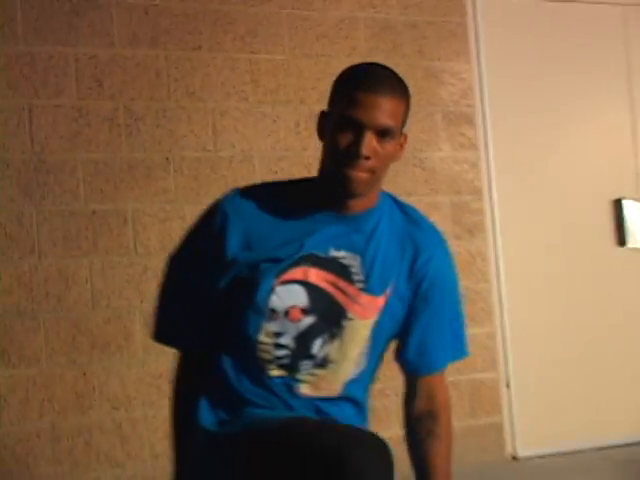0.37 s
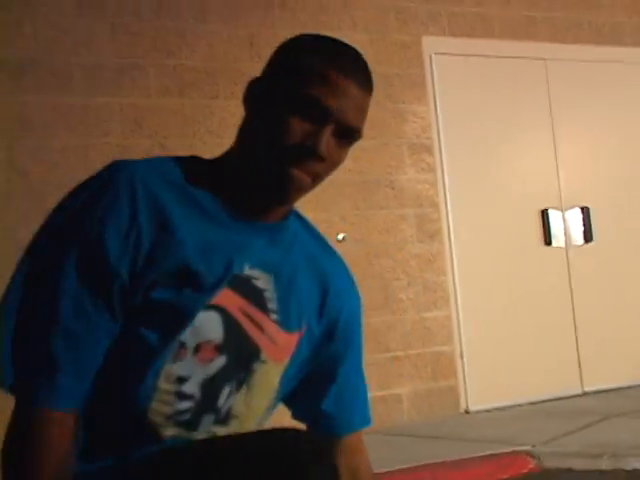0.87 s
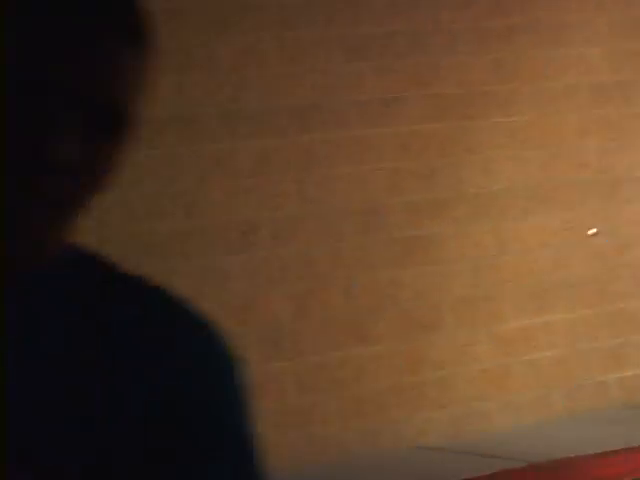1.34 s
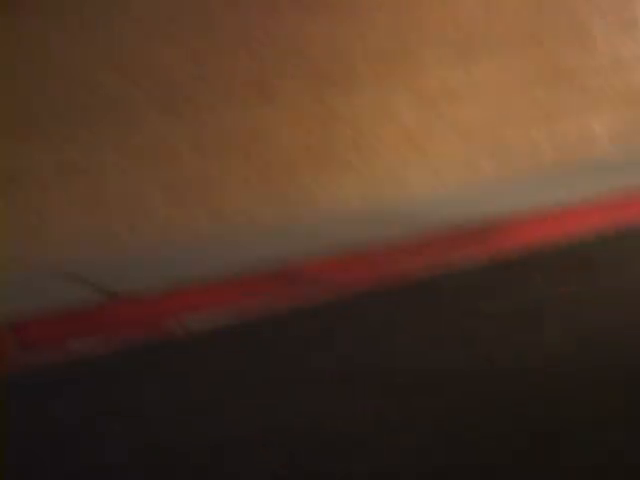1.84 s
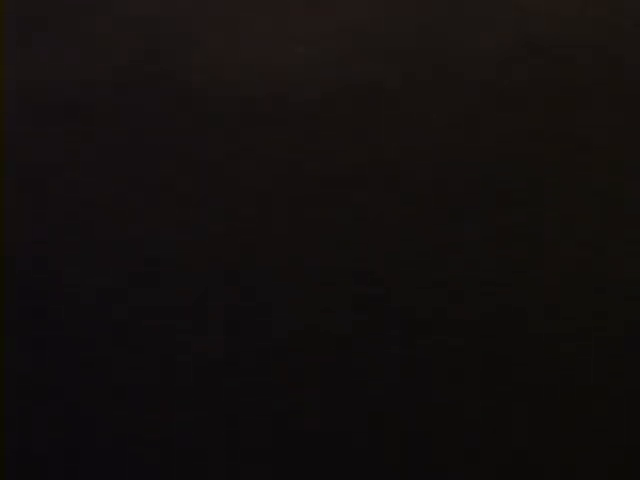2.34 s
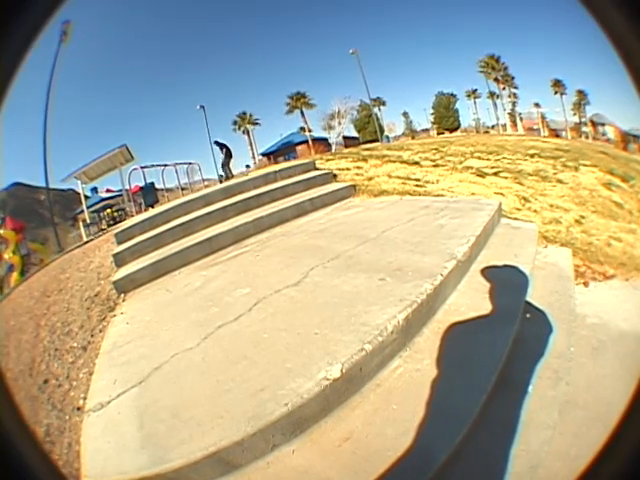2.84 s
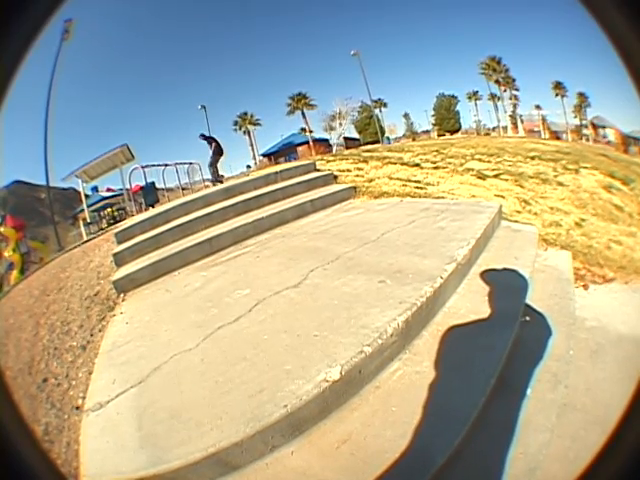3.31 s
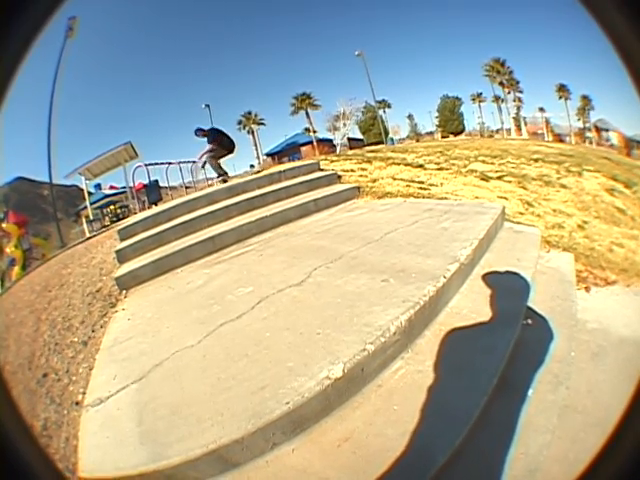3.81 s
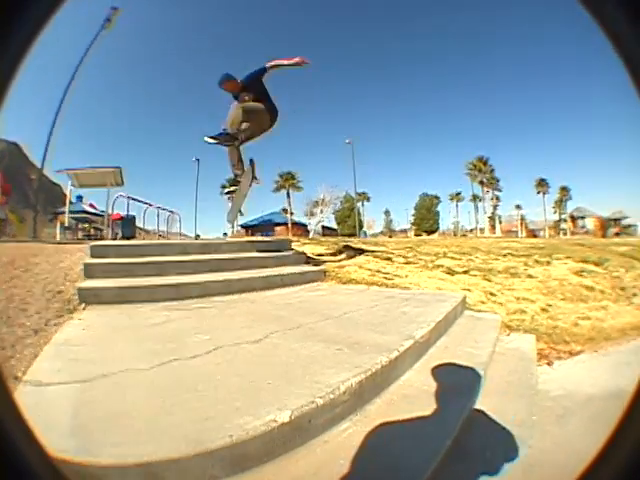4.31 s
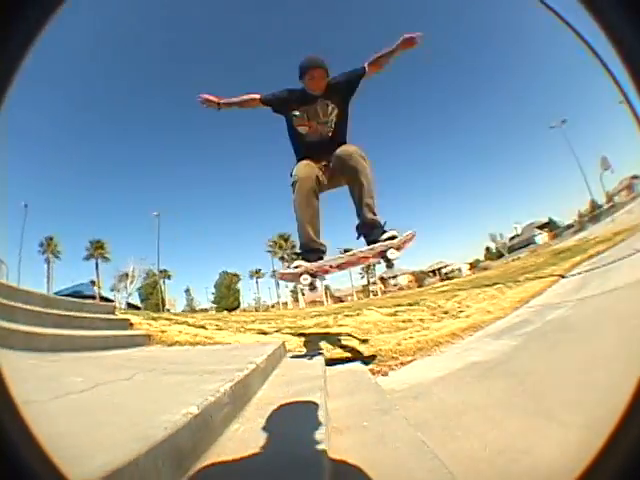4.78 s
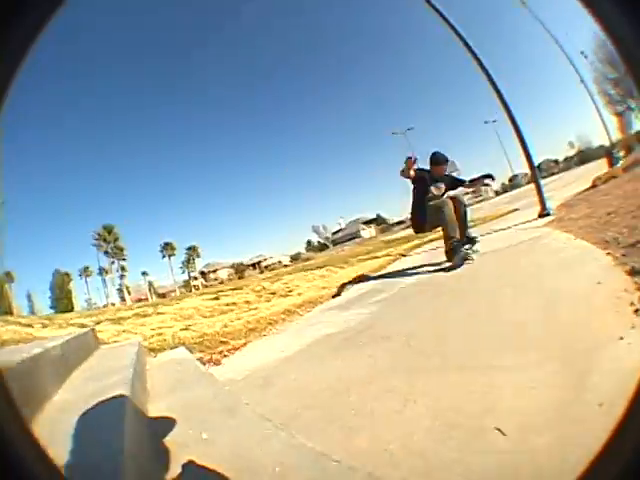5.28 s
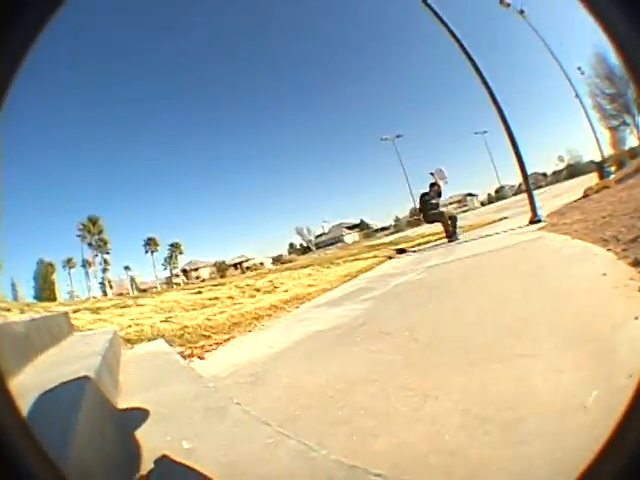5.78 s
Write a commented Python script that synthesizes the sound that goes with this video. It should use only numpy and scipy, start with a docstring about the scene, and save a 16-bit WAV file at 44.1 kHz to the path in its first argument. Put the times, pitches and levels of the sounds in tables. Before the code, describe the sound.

From 0 to about 2.5 s a small generator holds a low, buzzing hum near 70 Hz with throbbing clatter, rising very slightly at the end. A skateboard on coarse asphalt gets loud from 0.8 s, with hard wooden knocks between 0.9 and 1.4 s, a short skid near 1.0 s and another knock at 1.75 s, then fades. At 2.55 s everything cuts instantly to a quiet open park with faint low town noise. A board nears on smooth concrete: a soft double clack at 2.75 and 2.84 s, a much sharper pair at 3.45 and 3.53 s, growing grit, scuffs, then a crisp pop at 4.25 s. In the air, thin bearing whirr and fluttering hiss. At 4.95 s a massive clustered slam distorts the microphone, followed by gritty rolling, a loud slap at 5.3 s, smaller knocks until 5.85 s, and deep wind buffets.

```python
"""A car park at night, then a park by day, with an abrupt cut between them.
Night: a small generator drones (tones over throbbing noise) while a skateboard rolls off over rough asphalt.
Day: a board nears over smooth slabs, clacks across two joints, pops, spins in the air, slams down hard enough
to overload the input and rolls away. Rolling is gritty noise through resonances; blows are short chatter
ringing the board; wind on the single microphone is deep, lumpy noise."""
import sys
import numpy as np
from scipy import signal
from scipy.fft import rfft, irfft, next_fast_len
from scipy.io import wavfile
from scipy.ndimage import uniform_filter1d

SR = 44100
rng = np.random.default_rng(int(sys.argv[2]) if len(sys.argv) > 2 else 0)


def volts_from_decibels(level):
    """Turn decibel levels (scalar or array-like) into linear amplitude factors."""
    exponent = np.asarray(level, float) / 20
    return 10 ** exponent


def digitize_waveform(pressure):
    """Quantize a signal to 16-bit integers and store it at the path in sys.argv[1].

    Rows of a 2-D input are taken as channels; values are limited to [-1, 1].
    """
    field = np.atleast_2d(pressure).T
    bounded = np.clip(field, -1, 1)
    quanta = np.round(bounded * 32767).astype(np.int16)
    wavfile.write(sys.argv[1], SR, quanta)


N = 260173
CUT_S = 2.545      # night becomes day
TAKE_OFF_S, LANDING_S = 4.26, 4.955

# generator speed: t/s, firing f/Hz
FIRING_RATE = [(0.15, 71.35), (1.62, 71.6), (2.45, 73.04)]
# exhaust tones: multiple of the firing rate, relative level/dB
EXHAUST_TONES = [(0.5, -22), (1, 0), (1.5, -6.5), (2, -12.5), (2.5, -5), (3, -11), (3.5, -8), (4, -16),
                 (4.5, -23.5), (5, -14.5), (5.5, -27), (6, -26), (6.5, -16.5), (7, -33)]
# colour of the engine clatter: f/Hz, relative level per Hz/dB
CLATTER_COLOUR = [(65, -21), (110, -3.5), (188, 0.5), (386, -9), (455, -47), (700, -23), (896, -8),
                  (1380, -26), (2890, -27), (5250, -26.5), (7770, -48), (15000, -55)]
# rolling past on asphalt: t/s, deck level/dB, wheel level/dB, bearing level/dB
ASPHALT_LEVELS = [(0.0, -29, -37.5, -42.5), (0.7, -27.5, -37.5, -41), (0.78, -21.5, -31.5, -38),
                  (0.863, -25, -27, -33), (0.945, -23, -26, -33), (0.96, -20, -21.5, -29),
                  (1.05, -21.5, -18, -30.5), (1.11, -21, -20, -29.5), (1.29, -19, -22.5, -27.5),
                  (1.42, -18.5, -21, -23.5), (1.5, -20.5, -21.5, -27.5), (1.6, -19, -22, -26),
                  (1.75, -25, -24.5, -30.5), (1.9, -27, -23, -32), (2.1, -29.5, -29, -34),
                  (2.22, -30.5, -28, -35.5), (2.32, -31, -38.5, -40.5), (2.54, -33.5, -41.5, -46.5)]
# nearing, flying past and rolling away over slabs: t/s, deck level/dB, wheel level/dB, bearing level/dB
SLAB_LEVELS = [(2.55, -43, -46, -65.5), (2.8, -45.5, -45, -57), (3.05, -39.5, -39.5, -52.5),
               (3.3, -43, -39.5, -50), (3.45, -40, -38.5, -45.5), (3.73, -38.5, -36.5, -45),
               (3.9, -35, -34, -43.5), (4.085, -31.5, -29.5, -40), (4.2, -38, -34, -34.5),
               (4.3, -43, -32, -33.5), (4.45, -49.5, -31, -39), (4.66, -38, -30, -30.5),
               (4.94, -34, -31.5, -33), (5.0, -21.5, -22.5, -29.5), (5.114, -29.5, -30.5, -40),
               (5.18, -25, -27.5, -33.5), (5.285, -25.5, -21.5, -28.5), (5.38, -28.5, -22, -28.5),
               (5.43, -28.5, -24, -33.5), (5.445, -24, -22, -32), (5.5, -25.5, -22, -31.5),
               (5.54, -23.5, -19, -29.5), (5.66, -21, -23.5, -32), (5.78, -27.5, -34, -40.5),
               (5.85, -25, -27.5, -36), (5.9, -35, -33.5, -42.5)]
# resonances that the rolling drives, all with columns f/Hz, width/Hz, relative level/dB
DECK_ON_ASPHALT_PEAKS = [(262, 78, -5.5), (427.6, 50, -4.5), (502, 47, -2), (586.6, 50, 1.5), (703, 83, -4),
                         (805, 110, -7)]
WHEEL_ON_ASPHALT_PEAKS = [(1007, 180, -4), (1233, 110, -3.5), (1411, 172, -2)]
TRUCK_ON_ASPHALT_PEAKS = [(1575, 146, 8.5), (1868, 280, 7), (2150, 340, 1)]
SLAB_BOOM_PEAKS = [(109, 82, -7), (162.6, 23, 2), (222, 37, -4.5)]
DECK_ON_SLABS_PEAKS = [(364, 73, -0.5), (500, 56, 3.5), (600, 65, 2), (677.6, 45, 5.5), (790, 100, 1.5)]
WHEEL_ON_SLABS_PEAKS = [(900, 130, 1), (1130, 137, 2.5), (1450, 222, 4), (1757, 132, 1), (2023, 244, -1)]
AXLE_PEAKS = [(2350, 840, -6.5), (3240, 420, -5.5), (3530, 190, 1.5), (3945, 200, -0.5)]
# ring of the bearing race: f/Hz, width/Hz, relative level/dB
BEARING_RACE_PEAKS = [(5410, 520, 0)]
# ring of the skidding wheel: f/Hz, width/Hz, relative level/dB
SKID_PEAKS = [(1270, 140, 2), (1420, 170, -1)]
# colour of the bearing hiss by night and by day: f/Hz, relative level per Hz/dB
BEARINGS_NIGHT_COLOUR = [(1350, -41), (2300, -5), (3110, -9), (3480, -11.5), (3770, -11), (4990, -7),
                         (7260, -14.5), (7990, -13.5), (9150, -18.5), (15500, -51.5)]
BEARINGS_DAY_COLOUR = [(3400, -46), (4400, -8), (4900, -5), (5250, -5), (5650, -10.5), (6300, -9),
                       (8500, -12.5), (10400, -20.5), (12800, -36), (15500, -39)]
# colour of the far town noise by day: f/Hz, relative level per Hz/dB
TOWN_COLOUR = [(40, -13), (250, -2.5), (700, -11), (1800, -27), (2600, -26), (15500, -46)]
# what the struck board rings with: f/Hz, relative level/dB, time to fall by 60 dB/s
BOARD_MODES = [(82, -7, 0.054), (190, -7, 0.061), (310, 2, 0.028), (520, -2, 0.033), (699, 0.5, 0.021),
               (920, 2.5, 0.015), (1038, 3.5, 0.016), (1310, -1.5, 0.019), (1520, 3, 0.016),
               (1784, 3, 0.014), (2150, -10, 0.03), (2710, 1.5, 0.0086), (3083, -1, 0.016),
               (3700, 0, 0.018), (4200, -1.5, 0.012), (5200, 6, 0.0049), (6810, 5, 0.0029),
               (8700, 1.5, 0.0036), (13200, -17, 0.0067)]
# nearing, in the air, rolling away: slab boom below deck/dB, axle below bearings/dB (not used in the air)
STAGE_OFFSETS = [(6, 6.5), (10, 0), (12, 7.5)]
# moments when the flipping board shows its edge: t/s
EDGE_ON_TIMES = [4.13, 4.345, 4.564, 4.757, 4.9, 5.04]
# knocks of board, wheels and feet: rough ground, scuffs before the pop, a tick of catching feet in the air:
# t/s, peak level/dB, chatter length/s, favoured f/Hz
BOARD_WHEEL_FOOT_KNOCKS = [(0.286, -26, 0.003, 720), (0.53, -20.5, 0.0035, 1800),
                           (0.89, -12.5, 0.0037, 540), (0.953, -7, 0.0074, 1420),
                           (1.043, -6.5, 0.004, 1280), (1.259, -7, 0.0077, 1460),
                           (1.335, -5.5, 0.0064, 310), (1.405, -3, 0.0024, 590), (1.745, -11, 0.0072, 1230),
                           (3.85, -20, 0.012, 190), (4.187, -23, 0.013, 310), (4.212, -14.5, 0.016, 310),
                           (4.23, -12, 0.0053, 5200), (4.77, -18.5, 0.0028, 5200), (5.031, -9, 0.0081, 520),
                           (5.074, -11, 0.004, 630), (5.185, -12, 0.0091, 500), (5.443, -12, 0.0044, 1410),
                           (5.544, -7.5, 0.0044, 744), (5.823, -9, 0.0074, 520),
                           (5.847, -3.5, 0.0014, 1360)]
# what a knock shakes, one row each for deep, low, middle, high pitch: deck share/dB, truck share/dB
KNOCK_SHARES_BY_PITCH = [(4, -5), (6, -9), (-5, -16), (-4, -2)]
# slab joints: front wheels t/s, peak level/dB, back wheels t/s, peak level/dB, deck share/dB
SLAB_JOINTS = [(2.753, -13, 2.841, -12, 1.5), (3.4471, -4, 3.5334, -1, -4.5)]
# contacts of pop, landing and the slap after it:
# t/s, peak level/dB, truck share/dB, chatter length/s, favoured f/Hz
SLAM_CONTACTS = [(4.245, 4, 2, 0.0014, 3700), (4.248, 3.5, -4, 0.0029, 1520),
                 (4.2549, 3, 4.5, 0.0032, 3700), (4.954, 21, -7, 0.004, 870), (4.96, 10, 2.5, 0.008, 1330),
                 (4.970, 12, 0, 0.0057, 520), (4.976, 14.5, -20, 0.0043, 900),
                 (4.983, 6.5, -8, 0.0058, 520), (5.2964, 11, -10, 0.0058, 1130),
                 (5.303, 0.5, -9, 0.0086, 520)]
# gusts on the microphone: t/s, push level/dB, half length/s, flutter over push/dB
WIND_GUSTS = [(2.2, -28.5, 0.073, -30), (4.613, -46, .06, -15), (4.87, -29.5, .08, -10),
              (4.999, -33, 0.063, 8.5), (5.232, -36, 0.095, 1), (5.562, -47, .06, 14), (5.85, -41, 0.13, 6)]


def rms_one(x):
    """Scale to unit rms."""
    return x / np.sqrt(np.mean(x ** 2) + 1e-20)


def in_time(rows):
    """Draw each column of a table as a curve over every sample."""
    s, *columns = np.transpose(rows)
    return [np.interp(np.arange(N) / SR, s, column) for column in columns]


def drift(rate):
    """Slow random wander of spread 1, changing about rate times a second."""
    r = np.exp(-2 * np.pi * rate / SR)
    noise = rng.standard_normal(N + SR)
    return rms_one(signal.lfilter([1], [1, -2 * r, r * r], noise)[SR:])      # drop the filter's warm-up


def coloured(x, spectrum):
    """Give a broad signal a spectrum; rms 1."""
    size = next_fast_len(N)
    hz, db = np.transpose(spectrum)
    grid = np.maximum(np.arange(size // 2 + 1) * SR / size, 1)
    gain = volts_from_decibels(np.interp(np.log(grid), np.log(hz), db))
    return rms_one(irfft(rfft(x, size) * gain, size)[:N])


def resonant(x, peaks):
    """Parallel resonances, each passed twice so the valleys between them stay dark; rms 1."""
    out = 0
    for k, (hz, width_hz, db) in enumerate(peaks):
        r = np.exp(-np.pi * 1.5 * width_hz / SR)      # each pass is wider; two together give about width_hz
        b = (1 - r * r) / 2 * np.array([1, 0, -1])
        a = [1, -2 * r * np.cos(2 * np.pi * hz / SR), r * r]
        twice = signal.lfilter(b, a, signal.lfilter(b, a, x))
        out = out + (-1) ** k * volts_from_decibels(db) * twice
    return rms_one(out)


def ring(x, hz, t60):
    """A decaying mode: a unit click rings at about height 1 and falls 60 dB in t60 seconds."""
    r, w = volts_from_decibels(-60 / (t60 * SR)), 2 * np.pi * hz / SR
    return signal.lfilter([0, np.sin(w)], [1, -2 * r * np.cos(w), r * r], x + 1e-18)


def grit(per_s, spread_db, smooth, lumps_db):
    """Ground under the wheels: uneven clicks on a smooth rub, with a level that wanders in lumps."""
    sizes = volts_from_decibels(spread_db * np.minimum(rng.exponential(1, N), 5)) * rng.choice([-1, 1], N)
    clicks = rms_one(sizes * (rng.random(N) < per_s / SR))
    rub = smooth * rng.standard_normal(N)
    return (clicks + rub) * volts_from_decibels(lumps_db * drift(30))


def generator():
    """Low orders of one repeating exhaust pulse, wavering a little, over clatter that throbs with the cycle."""
    cycles = np.cumsum(in_time(FIRING_RATE)[0]) / SR
    tones = 0
    for order, db in EXHAUST_TONES:
        phase = order * cycles + 0.1094 * order ** 2      # the pipe smears the pulse
        waver_db = 0.2 * order * drift(2.7)      # high orders waver most
        tones = tones + volts_from_decibels(db + waver_db) * np.cos(2 * np.pi * phase)
    throb = 1 + 0.78 * np.cos(np.pi * cycles)      # once per two firings
    clatter = coloured(rng.standard_normal(N), CLATTER_COLOUR) * throb * volts_from_decibels(.5 * drift(20))
    return volts_from_decibels(-24.5) * rms_one(tones) + volts_from_decibels(-36) * clatter


def asphalt_roll():
    """Coarse stones under front and back wheels shake deck, wheels, trucks and bearings."""
    deck_db, wheel_db, bearing_db = in_time(ASPHALT_LEVELS)
    t = np.arange(N) / SR
    truck_lag_s, truck_under_wheel_db, truck_fades_db_per_s = 0.024, 6, 0.5
    late_wheel_db = np.interp(t - truck_lag_s, t, wheel_db)      # the trucks come into view after the wheels
    truck_db = late_wheel_db - truck_under_wheel_db - truck_fades_db_per_s * (t - 1)
    near = np.clip((wheel_db + 42) / 18, .2, 1)      # distance blurs the lumps
    front = grit(per_s=3000., spread_db=4.5, smooth=0.65, lumps_db=2.66 * near)
    back = grit(per_s=3500., spread_db=4.5, smooth=0.94, lumps_db=0.79 * near)
    chips = grit(per_s=150., spread_db=4.5, smooth=0.1, lumps_db=2.0)      # loose chips crackle
    hiss = coloured(front + back + 0.67 * chips, BEARINGS_NIGHT_COLOUR) * volts_from_decibels(1.54 * drift(13.4))
    return (volts_from_decibels(deck_db) * resonant(back, DECK_ON_ASPHALT_PEAKS)
            + volts_from_decibels(wheel_db) * resonant(front + 0.5 * back, WHEEL_ON_ASPHALT_PEAKS)
            + volts_from_decibels(truck_db) * resonant(front + 0.6 * back, TRUCK_ON_ASPHALT_PEAKS)
            + volts_from_decibels(bearing_db) * hiss
            + skid(back))


def skid(stones):
    """A wheel skids briefly: the stones drive its ring, which rises fast, holds and stops."""
    start_s, rise_s, length_s, level_db = 0.96, 0.0018, .1, -17
    since = np.maximum(np.arange(N) / SR - start_s, 0)
    envelope = (1 - np.exp(-since / rise_s)) * np.exp(-(since / length_s) ** 6)
    return volts_from_decibels(level_db) * envelope * resonant(stones, SKID_PEAKS)


def wind():
    """Lumpy pressure on the microphone: a deep push with a quicker flutter in gusts, and in the day's calm."""
    calm_night_db, calm_day_db, flutter_over_calm_db = -38.5, -52, -1.5
    t = np.arange(N) / SR
    calm = volts_from_decibels(np.where(t < CUT_S, calm_night_db, calm_day_db))
    push_level = calm
    flutter_level = volts_from_decibels(flutter_over_calm_db) * calm * (t >= CUT_S)
    for s, db, half_s, flutter_db in WIND_GUSTS:
        gust = volts_from_decibels(db) * np.exp(-((t - s) / half_s) ** 2)
        push_level = push_level + gust
        flutter_level = flutter_level + volts_from_decibels(flutter_db) * gust
    lumps = rng.standard_normal(N) * volts_from_decibels(1.0 * drift(6.8))

    def band(low_hz, high_hz):
        """One band of the lumps, its level swings halved; rms 1."""
        x = signal.sosfilt(signal.butter(2, [low_hz, high_hz], "band", fs=SR, output="sos"), lumps)
        return rms_one(x / uniform_filter1d(x ** 2, size=SR // 16) ** .25)

    return push_level * band(24, 51) + flutter_level * band(55, 99)


def contacts():
    """Every blow as (t/s, peak/dB, deck share/dB, truck share/dB, chatter length/s, favoured f/Hz)."""
    rows = []
    for s, db, length_s, hz in BOARD_WHEEL_FOOT_KNOCKS:
        deck_db, truck_db = KNOCK_SHARES_BY_PITCH[np.digitize(hz, [400, 850, 2500])]
        rows.append((s, db, deck_db, truck_db, length_s, hz))
    for s, db, truck_db, length_s, hz in SLAM_CONTACTS:
        deck_db = -1 - 6 * np.log2(hz / 1000)      # low contacts flex the deck more
        rows.append((s, db, deck_db, truck_db, length_s, hz))
    front_hz, back_hz, snap_hz = 1050, 1260, 5200      # lip and bounces snap in the trucks
    lip_s, lip_db, lip_truck_db = 0.00163, -11, -7
    joint_truck_db, joint_chatter_s = -11, 0.0018
    bounce_s, bounce_loss_db, bounce_chatter_s = 0.0092, 6.5, 0.006
    for front_s, front_db, back_s, back_db, deck_db in SLAB_JOINTS:
        for s, db, hz in (front_s, front_db, front_hz), (back_s, back_db, back_hz):
            # the wheel ticks on the lip first, lip_s ahead; that tick's chatter is as long
            rows.append((s - lip_s, db + lip_db, deck_db, lip_truck_db, lip_s, snap_hz))
            rows.append((s, db, deck_db, joint_truck_db, joint_chatter_s, hz))
        for k in (1, 2):      # the front wheels bounce twice
            rows.append((front_s + k * bounce_s, front_db - k * bounce_loss_db, deck_db,
                         joint_truck_db, bounce_chatter_s, snap_hz))
    return rows


def blows():
    """Each blow is a short chatter of contacts into the board: deck modes low, wheels between, trucks high."""
    crack_db, heavy_db = -9, 7.5
    span = np.arange(round(.12 * SR)) / SR
    out = np.zeros(N + len(span))
    for s, db, deck_db, truck_db, length_s, pitch_hz in contacts():
        noise = rng.standard_normal(len(span))
        chatter = noise * (1 - np.exp(-span / 0.00051)) * np.exp(-(span / length_s) ** 2)
        chatter[round(.0006 * SR)] += 6.      # one hard contact early on
        blow = volts_from_decibels(truck_db + crack_db) * np.diff(chatter, n=2, prepend=[0, 0])      # dry crack on top
        for k, (hz, mode_db, t60) in enumerate(BOARD_MODES):
            share_db = deck_db if hz < 850 else 0 if hz < 2500 else truck_db
            if hz < min(250, .8 * pitch_hz):      # only heavy blows flex the whole deck
                share_db += 0.51 * min(db - heavy_db, 0)
            if hz < 400 and db > 0:      # the hardest contacts are short and favour the higher modes
                share_db -= 5
            # the spot struck favours nearby modes
            share_db += 7 * np.exp(-(np.log(hz / pitch_hz) / 0.16) ** 2)
            blow = blow + (-1) ** k * volts_from_decibels(mode_db + share_db) * ring(chatter, hz, t60)
        start = round(s * SR)
        out[start:start + len(span)] += volts_from_decibels(db) * blow / np.abs(blow).max()
    return out[:N]


def slab_roll():
    """Fine concrete drives slab, deck and wheels; bearings and axles whirr on by themselves."""
    deck_db, wheel_db, bearing_db = in_time(SLAB_LEVELS)
    t = np.arange(N) / SR
    stage = np.digitize(t, [TAKE_OFF_S, LANDING_S])      # 0 nearing, 1 in the air, 2 rolling away
    in_air = stage == 1
    boom_under_db, axle_under_db = np.array(STAGE_OFFSETS)[stage].T
    # the flipping board shows its edge and the wheels hide; up close they hide less
    turn = np.pi * np.interp(t, EDGE_ON_TIMES, np.arange(len(EDGE_ON_TIMES)))
    edge_on_db, edge_fills_db_per_s, flip_sharpness = -18, 17, 0.94
    edge_floor = volts_from_decibels(edge_on_db + edge_fills_db_per_s * (t - TAKE_OFF_S))
    flip = np.maximum(np.abs(np.sin(turn)) ** flip_sharpness, edge_floor)
    facing = np.where(in_air, flip, 1)
    axle_in_air_db, axle_swing_db = -38, 2
    axle_db = np.where(in_air, axle_in_air_db - axle_swing_db * np.cos(4 * turn), bearing_db - axle_under_db)
    ground = grit(per_s=3000., spread_db=0.0, smooth=0.73, lumps_db=1.5)
    balls = grit(per_s=5000., spread_db=2.5, smooth=1.4, lumps_db=.6)      # bearing balls
    return (volts_from_decibels(deck_db - boom_under_db) * resonant(ground, SLAB_BOOM_PEAKS)
            + volts_from_decibels(deck_db) * facing * resonant(ground, DECK_ON_SLABS_PEAKS)
            + volts_from_decibels(wheel_db) * facing * resonant(ground, WHEEL_ON_SLABS_PEAKS)
            + volts_from_decibels(bearing_db) * coloured(balls + 0.37 * ground, BEARINGS_DAY_COLOUR)
            + volts_from_decibels(bearing_db - 11) * resonant(balls, BEARING_RACE_PEAKS)
            + volts_from_decibels(axle_db + drift(14)) * resonant(balls, AXLE_PEAKS))


def town():
    """Far town noise: steady noise, mostly low."""
    return volts_from_decibels(-52) * coloured(rng.standard_normal(N), TOWN_COLOUR)


def scene():
    """Night until the cut, day after it; one microphone feeds both channels."""
    day = np.clip((np.arange(N) / SR - CUT_S) / 0.00175, 0, 1)      # the cut takes 1.75 ms
    night_sounds = generator() + asphalt_roll()
    day_sounds = slab_roll() + town()
    mono = (1 - day) * night_sounds + day * day_sounds + blows() + wind()
    return np.array([mono, mono])


def band_limit(x):
    """A steep low-pass at the top of the band."""
    return signal.sosfilt(signal.butter(12, 15640, fs=SR, output="sos"), x)


def record(dry):
    """The input overloads hard and its coupling lets the flat tops sag; the channels are almost alike."""
    flat_topped = np.clip(dry, -.93, .98)
    coupling = signal.butter(1, 14, "high", fs=SR, output="sos")
    sagging = signal.sosfilt(coupling, flat_topped)
    # the channels differ faintly, mostly in the treble
    apart = volts_from_decibels(-34.5) * np.diff(sagging[0], prepend=0) * drift(300)
    mix = sagging + apart * np.array([[1], [-1]])
    return band_limit(mix)


dry = scene()
out = record(dry)
digitize_waveform(out)
```